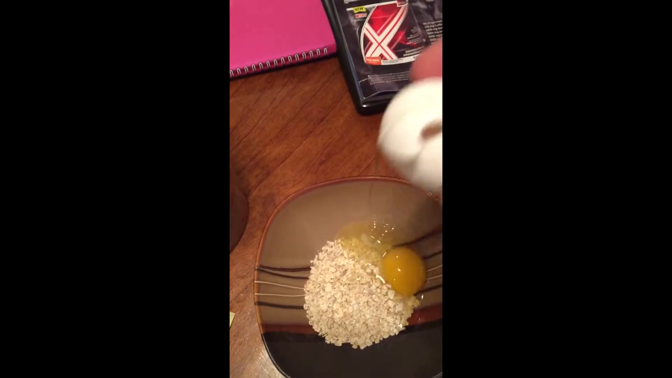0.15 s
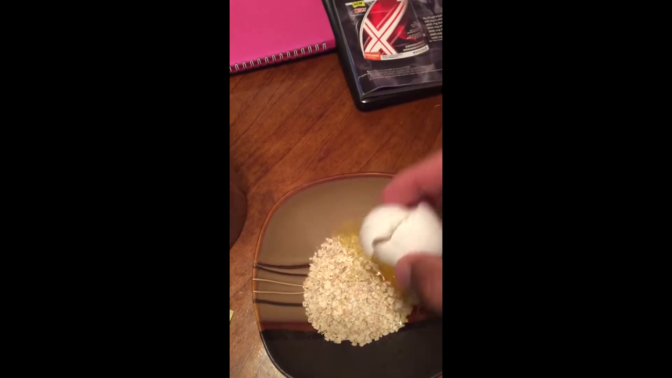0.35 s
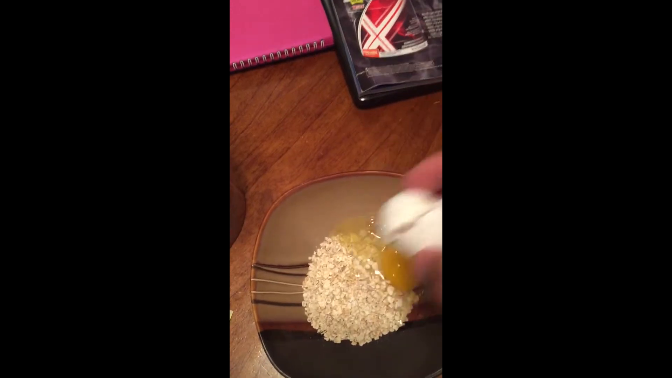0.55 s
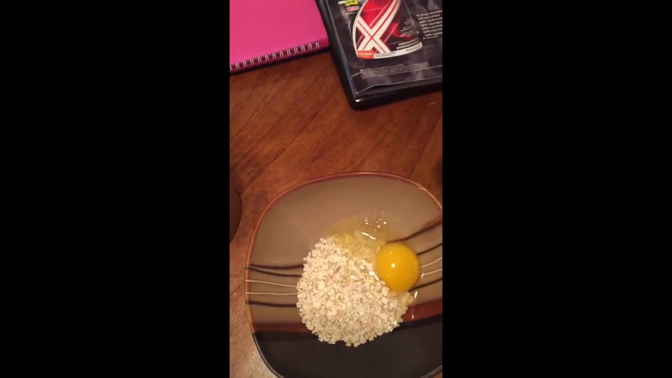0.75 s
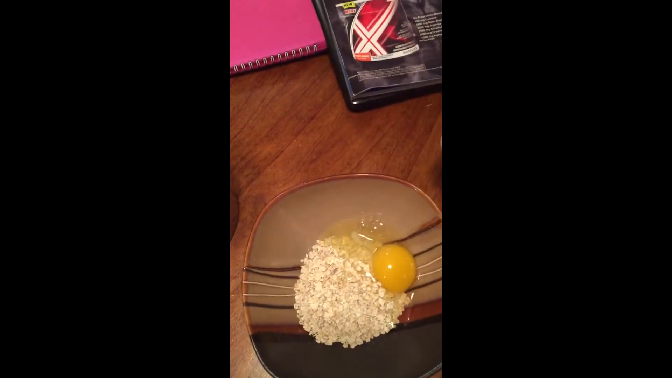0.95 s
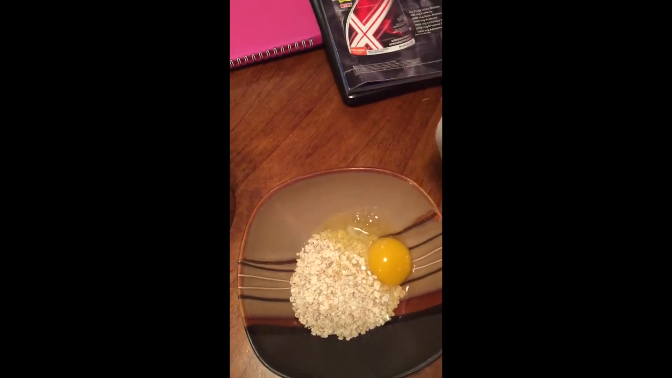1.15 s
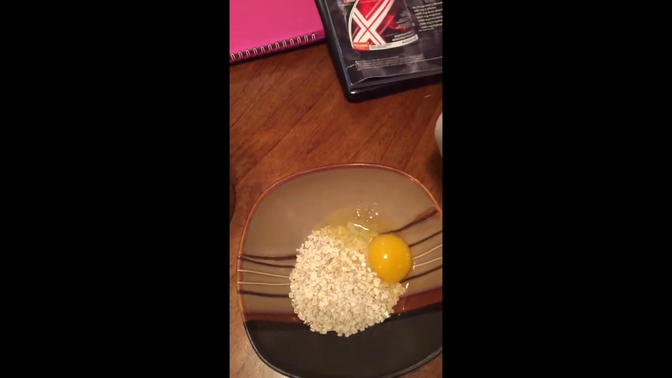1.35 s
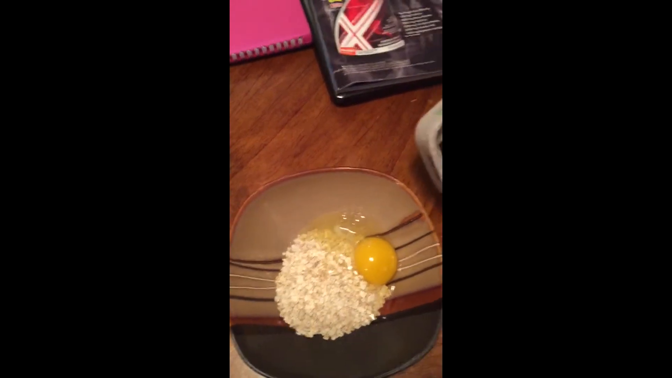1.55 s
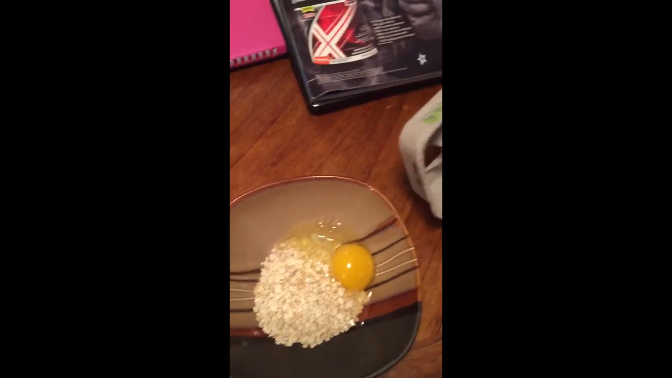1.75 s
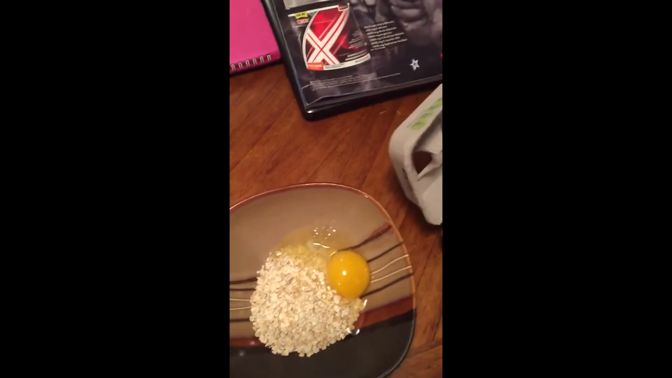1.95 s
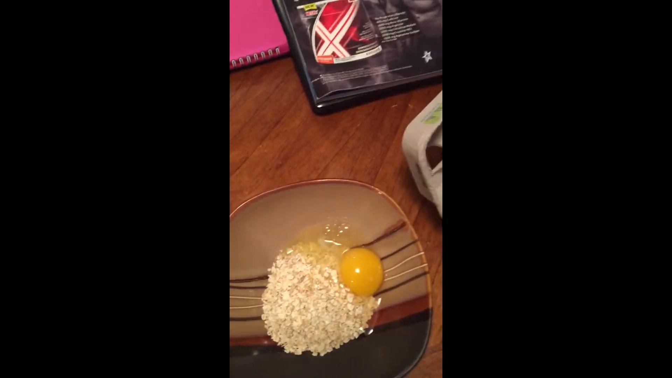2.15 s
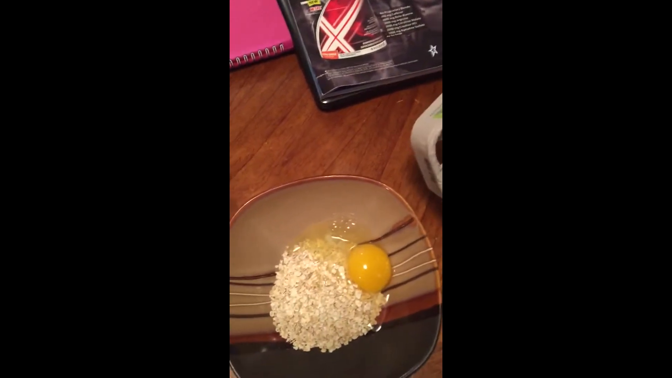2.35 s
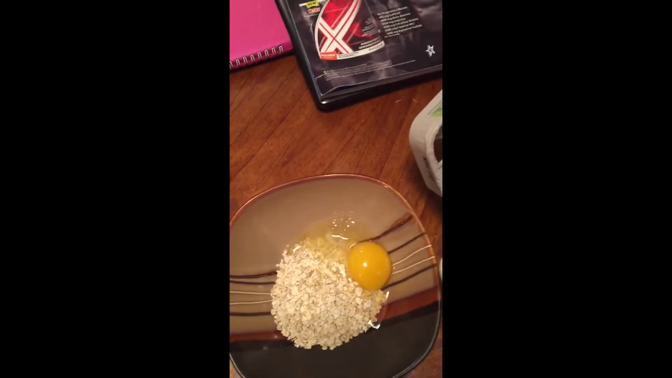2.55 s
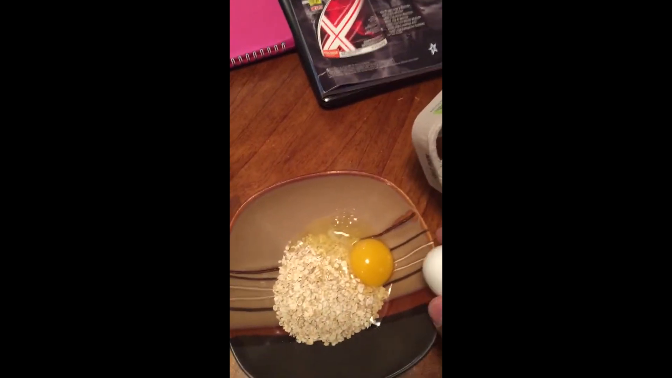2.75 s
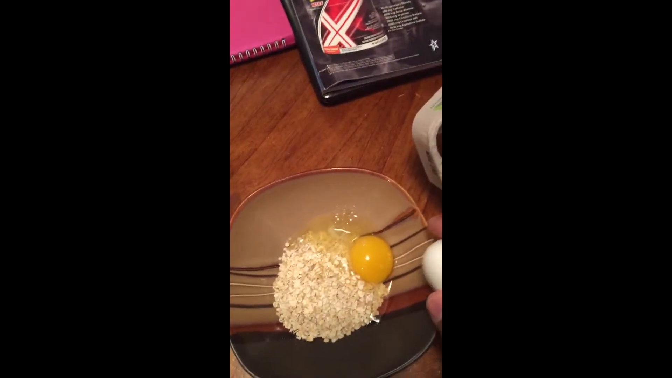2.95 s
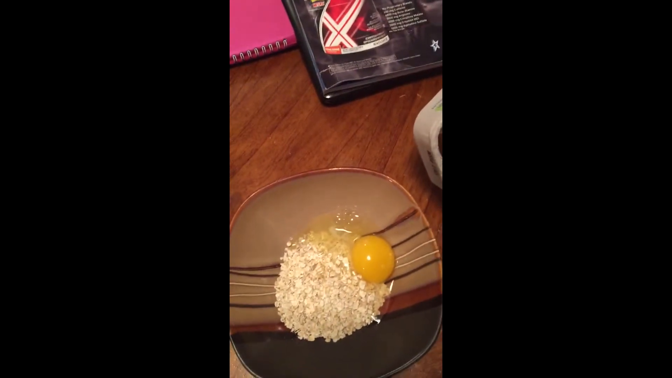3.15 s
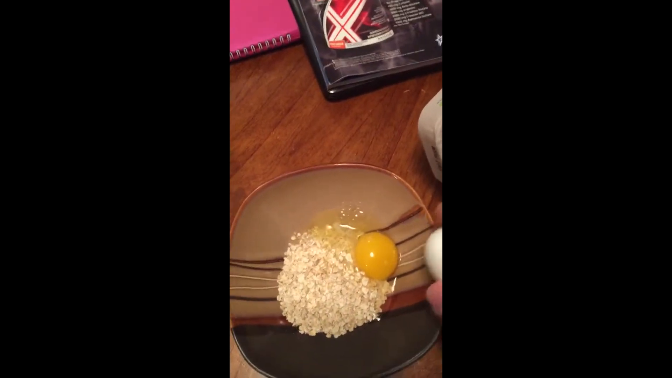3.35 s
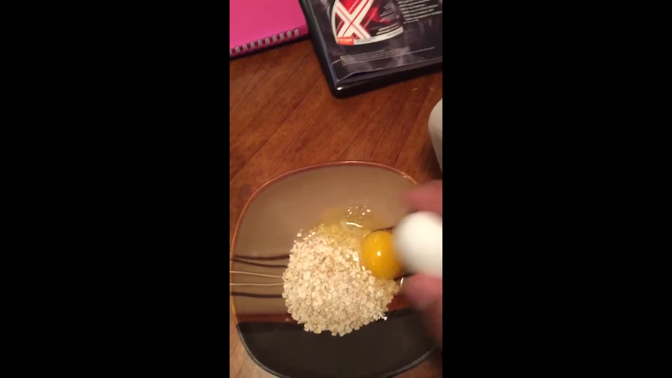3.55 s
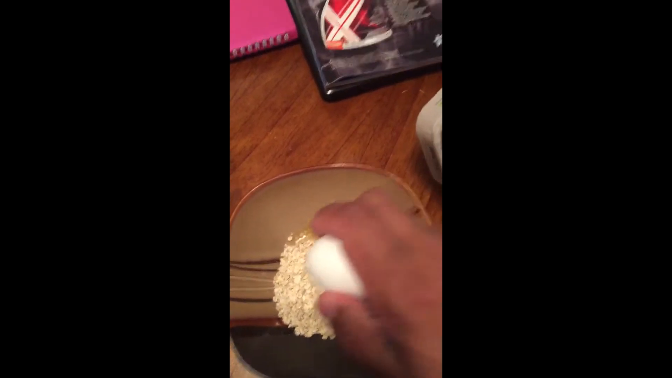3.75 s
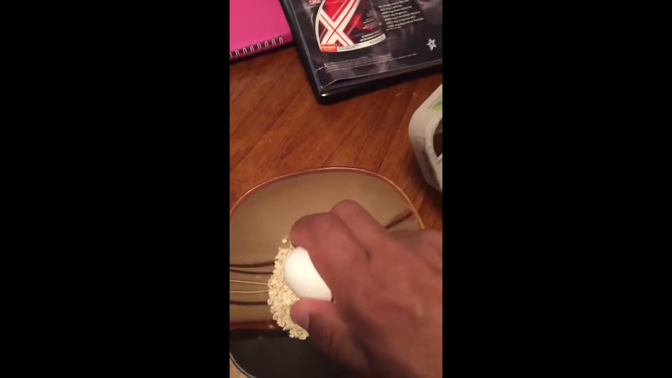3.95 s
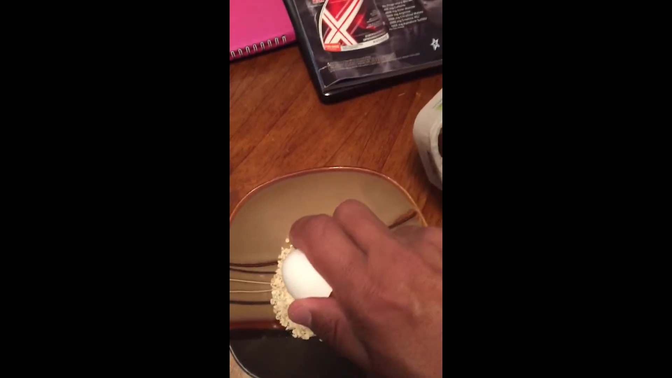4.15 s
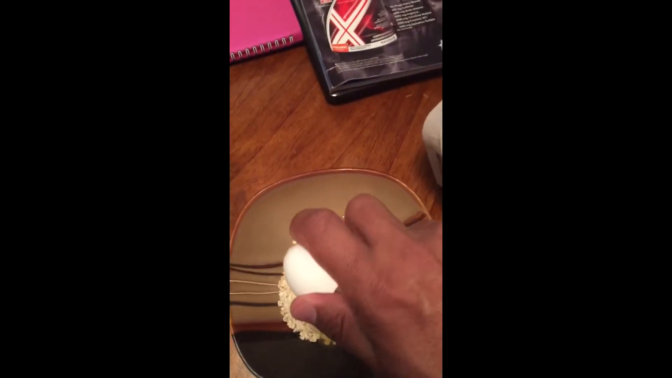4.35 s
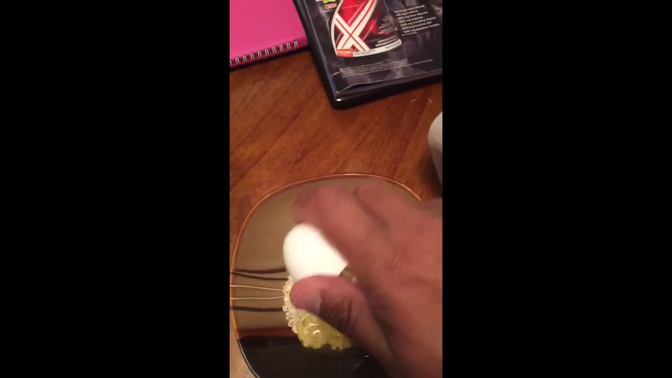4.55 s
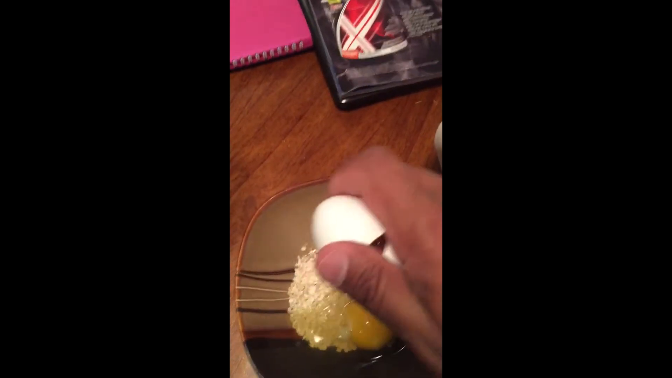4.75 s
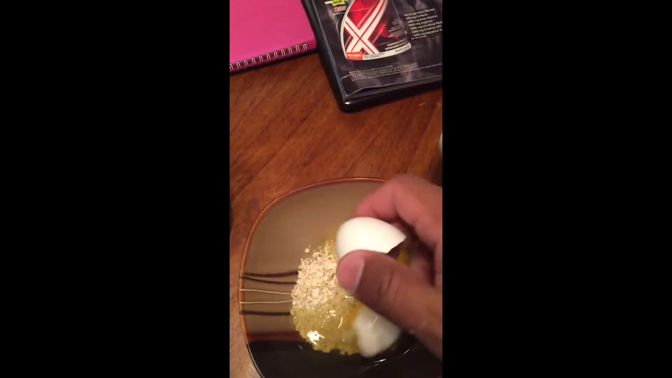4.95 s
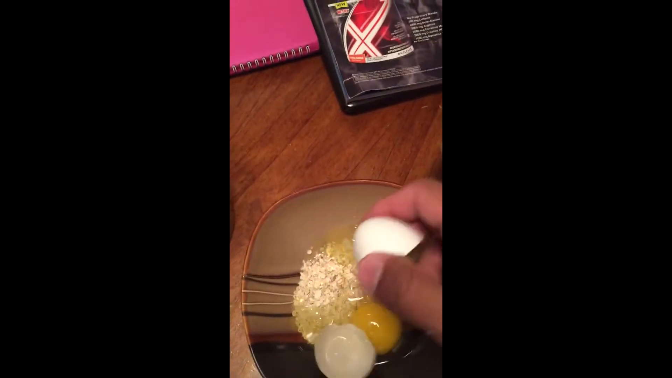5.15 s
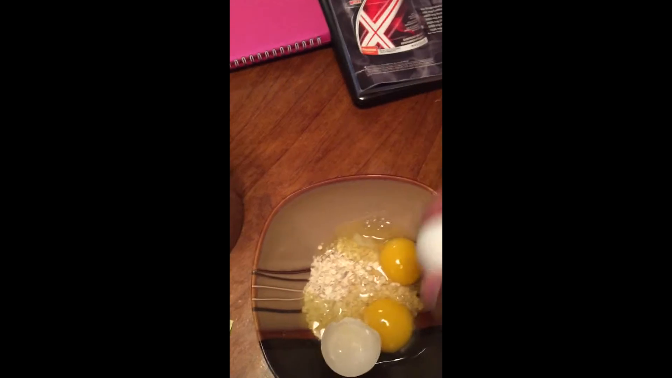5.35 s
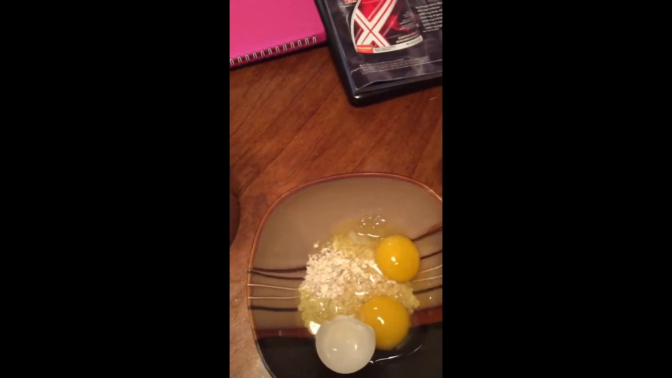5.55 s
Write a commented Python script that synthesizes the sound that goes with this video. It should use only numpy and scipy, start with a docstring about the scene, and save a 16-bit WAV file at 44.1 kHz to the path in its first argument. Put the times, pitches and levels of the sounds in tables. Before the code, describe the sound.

A faint, low fridge hum and soft room air run throughout in a small kitchen, with the microphone close above a bowl. At about 1 second an empty eggshell lands with a hollow pop and a tiny bounce. From 1.3 to 1.9 seconds an egg rasps softly out of a pulp carton, followed by a barely audible brush of fingers on shell. At 2.8 seconds the egg knocks against a ceramic bowl. At 3.3 seconds comes the loudest sound, a sharp crunching strike that makes the bowl ring briefly and rock on the wooden table. From 3.8 to 4.4 seconds the shell crackles open in quick, crisp snaps, with small wet squelches as the egg slips out. A few softer clicks and wet pops follow until 4.9 seconds. At 5.2 seconds half the shell drops into the bowl with a light clink, and small ticks follow until 5.5 seconds.

```python
"""A fridge hums in a small kitchen, and an empty eggshell is dropped aside with a hollow pop.
A new egg rasps out of its pulp carton. It is tapped, then struck on the rim of a ceramic bowl,
which rings and rocks on the wooden table. Thumbs crackle the shell open in volleys of tiny breaks,
the egg slips out with a squelch of air pockets, and half of the shell falls into the bowl.
A phone picks it all up from close by."""
import sys
import numpy as np
from scipy import signal
from scipy.fft import rfft, irfft
from scipy.io import wavfile

SR = 44100
rng = np.random.default_rng(int(sys.argv[2]) if len(sys.argv) > 2 else 0)


def wrap_up_sound(samples):
    """Save the sound to the file named by the first command line argument, as 16-bit audio."""
    columns = np.atleast_2d(samples).T
    # keep every value between -1 and 1, then stretch to whole-number steps
    tamed = np.clip(columns, -1, 1)
    steps = np.round(tamed * 32767).astype(np.int16)
    wavfile.write(sys.argv[1], SR, steps)


N = 247048
TIME = np.arange(N) / SR
AGE = np.arange(int(.7 * SR)) / SR  # seconds since a hit

# the kitchen's reverb: (frequency [Hz], t60 [s])
ROOM_DECAY = [(100, 1), (300, 0.66), (1000, 0.49), (3000, 0.44), (7000, 0.25), (15000, 0.2)]
# room tone: (frequency [Hz], relative level [dB])
AIR_EQ = [(15, -36), (25, -17), (59, 1.5), (88, -25), (101, -14.5), (125, -6.5), (146, -10), (191, -6),
          (293, -12), (383, -18), (543, -20.5), (856, -26), (1500, -27), (2240, -34), (15000, -49)]
# the fridge's drone bands: (centre [Hz], width [Hz], level [dB])
FRIDGE_BANDS = [(57, 14, -68.5), (124, 25, -67), (196.8, 69, -67), (545, 69, -65.5)]

# the empty shell lands and bounces: (time [s], level [dB], crush time [s])
SHELL_DROPS = [(0.8742, -48, 0.0055), (0.888, -49, 0.0042), (0.9515, -23, 0.0034), (0.9543, -24, 0.0014),
               (0.966, -28, 0.0062), (0.973, -26, 0.012), (0.982, -37, 0.0065)]
# its hollow tone: (frequency [Hz], gain [dB])
HOLLOW_EQ = [(30, -38), (200, -5.5), (600, -9), (800, 0), (1100, 7.5), (1400, -1.5), (1750, 2), (2100, -9),
             (4000, -11), (9000, -14), (15500, -21)]

# pulls that rub the egg out of the carton: (peak time [s], relative level [dB], rise [s])
CARTON_PULLS = [(1.39, -65.5, 0.1), (1.512, -49, 0.037), (1.59, -54.5, 0.22), (1.745, -45, 0.078),
                (1.8, -47, 0.032)]
# the rasp of pulp: (frequency [Hz], gain [dB])
PULP_EQ = [(200, -10), (600, -3), (1100, 6.5), (2000, 2), (3500, -1.5), (6000, -8), (9000, -16.5),
           (15000, -17.5)]
# the carton's damped walls: (frequency [Hz], relative level [dB], t60 [s])
CARTON_MODES = [(1204, 10, 0.092), (1580, 5, .03), (1980, 5, 0.062), (2720, 7.5, 0.043), (3350, -2, 0.029),
                (4300, -18, 0.023), (5700, 2.5, 0.04)]
# the egg catches on the carton: (time [s], level [dB], length [s])
CARTON_CATCHES = [(1.263, -45, .008), (1.522, -45, 0.0072), (1.795, -45, 0.0014)]
# fingers slide on the shell: (peak time [s], level [dB], rise [s])
FINGER_SLIDES = [(2.16, -62, 0.063), (2.29, -69.5, 0.12), (2.41, -62.5, .05)]
# the hiss of skin on shell: (frequency [Hz], gain [dB])
SKIN_EQ = [(1000, -7), (4000, -5), (6500, -6), (8000, 3.5), (10500, -4), (14500, 2)]

# the bowl is pushed against the table and rocks back:
# (time [s], swing level [dB], knock level [dB], contact brightness [Hz])
BOWL_BLOWS = [(2.824, -11, -14.5, 1065), (2.831, -19, -29.5, 840), (3.011, -34, -34.5, 750),
              (3.335, -12, -12.5, 1930), (3.3819, -18, -11, 1450), (3.3852, -11, -11.5, 1550),
              (3.3968, -27.5, -13.5, 826), (3.415, -21, -14, 1480)]
# low swings of the bowl on the table top: (frequency [Hz], relative level [dB], t60 [s])
SWING_MODES = [(205, -14, .3), (238, -17, .15), (294, 0, .27), (398, -9, .2), (490, -17, .15),
               (590, -14, .15), (657, -12, .2), (700, -15, .15), (870, -8, .17), (992, -13, .14),
               (1033, -11, .11), (1210, -18, .1)]
# the table's woody knock: (frequency [Hz], gain [dB])
WOOD_EQ = [(30, -40.5), (110, -13), (220, 4), (380, -0.5), (520, -2.5), (700, -1), (1000, 5), (1300, -4),
           (1900, -2), (3000, -5), (8000, 0.5)]
# shell meets ceramic: (time [s], crush level [dB], crush time [s], ring level [dB])
CERAMIC_HITS = [(2.8225, -35, 0.0022, -40), (3.0064, -68, 0.0025, -58), (3.3343, -5, 0.003, -11.5),
                (3.3401, -16, 0.0037, -46), (5.2, -45, 0.0016, -28.5)]
# the bowl's ringing wall: (frequency [Hz], relative level [dB], t60 [s])
CERAMIC_MODES = [(1936, -1, .12), (2010, 0, .17), (3270, 1.5, .2), (3410, -11, .29), (3731, -19, .18),
                 (5052, -9, .23), (5240, -14, .1), (6169, -15, .13), (6970, -7, .16), (7934, -11, .08),
                 (9286, -21, .15), (11850, -18, .12)]
# the crunch of shell on ceramic: (frequency [Hz], gain [dB])
CRUSH_EQ = [(40, -38.5), (250, -17.5), (600, -17.5), (1100, 3.5), (1600, -1), (2100, 3), (2700, 2.5),
            (4200, -2), (5800, 3.5), (8000, 1.5), (11000, -3.5), (15500, -4.5)]

# egg white slips out of the shell and into the bowl: (peak time [s], level [dB], rise [s])
SQUELCHES = [(4.13, -39, 0.023), (4.228, -40.5, 0.027), (4.34, -65, 0.26), (5.26, -61, 0.11)]
# air pockets in the white: (frequency [Hz], gain [dB])
WET_EQ = [(400, -27), (750, -20.5), (950, 3.5), (1250, -6), (1600, -6), (2100, -17), (3500, -19),
          (9000, -34)]
# thumbs crumble shell and membrane: (peak time [s], level [dB], rise [s])
THUMB_SQUEEZES = [(3.95, -36, 0.035), (4.063, -35.5, 0.019), (4.145, -46.5, .05), (4.228, -39.5, 0.024),
                  (4.3, -55, 0.037), (4.44, -55.5, 0.036), (4.51, -60, 0.058), (4.79, -56.5, .12),
                  (5.32, -62, .2)]
# the crisp tone of breaking shell: (frequency [Hz], gain [dB])
FRACTURE_EQ = [(100, -46), (700, -16), (1100, 4), (2200, 4.5), (3300, 5.5), (4800, 1.5), (6500, 3.5),
               (7500, -1.5), (8500, 3), (10500, -1.5), (13000, 3), (16000, 4)]
# dry snaps of the shell: (time [s], level [dB], length [s])
DRY_SNAPS = [(3.7756, -37.5, 0.0012), (3.785, -41.5, 0.0051), (3.866, -34.5, .0024), (3.9, -27, 0.0048),
             (3.916, -33, 0.0029), (3.921, -24, 0.00037), (3.932, -36, 0.0028), (3.9595, -28, 0.0015),
             (3.991, -39, .0025), (4.018, -35.5, 0.0034), (4.063, -29.5, 0.0027), (4.114, -13.5, 0.0019),
             (4.135, -33, 0.0017), (4.154, -25.5, 0.0038), (4.165, -34, 0.0046), (4.1894, -28.5, 0.00057),
             (4.492, -45.5, 0.0063), (4.63, -52.5, 0.0035), (4.7427, -25, 0.0028), (4.837, -48, 0.0024),
             (4.894, -55.5, 0.0032), (5.467, -33, 0.0019)]
# how far the shell in the hand gapes: (time [s], opening [0-1])
SHELL_GAPE = [(4.11, 0.02), (4.16, 0.9), (4.74, 1), (5.47, .4)]
# shell and membrane part: (time [s], note level [dB], length [s], note [Hz])
WET_POPS = [(4.1633, -30, 0.0077, 1070), (4.204, -37, 0.0012, 3700), (4.2146, -27.5, 0.0056, 3650),
            (4.2215, -25, 0.003, 3560), (4.229, -28, 0.0016, 3600), (4.3146, -30.5, 0.00083, 3570),
            (4.3152, -25.5, 0.00058, 1346), (4.4323, -42.5, .007, 1430), (4.622, -46.5, 0.0013, 3220),
            (4.775, -35.5, 0.0043, 1740), (4.79, -32, 0.0047, 1720), (5.347, -45, 0.0015, 3000)]
# half of the shell lands in the bowl and settles: (time [s], level [dB], length [s])
SHELL_LANDINGS = [(5.2, -22.5, 0.0009), (5.263, -46, 0.0037), (5.299, -42, 0.0033), (5.326, -47.5, 0.0052)]


def amp(db):
    """Decibels to gain."""
    return 10 ** (np.asarray(db) / 20)


def unit(x):
    """Scale a transient to the energy of 2 ms at full level."""
    return x * np.sqrt(.002 * SR / np.sum(x ** 2))


def steady(x):
    """Scale a lasting sound to rms 1."""
    return x / np.std(x)


def along(points, hz):
    """Read (frequency, value) points on a log-frequency axis."""
    point_hz, value = np.transpose(points)
    return np.interp(np.log(hz + 1), np.log(point_hz), value)


def through(x, response):
    """Convolve, keeping the length."""
    return signal.fftconvolve(x, response)[:len(x)]


def colour(x, eq, size=4096):
    """Apply an EQ curve as a causal filter, built from its cepstrum."""
    gain = amp(along(eq, np.fft.rfftfreq(size, 1 / SR)))
    cepstrum = irfft(np.log(gain))
    cepstrum[1:size // 2] *= 2
    cepstrum[size // 2 + 1:] = 0
    return through(x, irfft(np.exp(rfft(cepstrum))))


def soften(x, hz, order=2):
    """Low-pass: a softer contact gives a longer push."""
    return signal.sosfilt(signal.butter(order, min(hz, SR / 2 - 1000), fs=SR, output="sos"), x)


def ring(modes):
    """Damped sines; neighbouring modes swing in opposite directions."""
    return sum((-1) ** k * amp(db - 60 * AGE / t60) * np.sin(2 * np.pi * hz * AGE)
               for k, (hz, db, t60) in enumerate(modes))


def add(track, s, sound):
    """Mix a sound into the track at time s."""
    start = int(s * SR)
    track[start:start + len(sound)] += sound[:N - start]


def grains(count, spread_db):
    """A dense run of tiny slips or breaks of unequal size."""
    return steady(rng.standard_normal(count) * amp(spread_db * rng.standard_normal(count)))


def effort(strokes, release):
    """Each stroke swells by 20 dB over its rise time and falls as far in release times that long."""
    swells = [amp(db - 20 * np.maximum(s - TIME, (TIME - s) / release) / rise) for s, db, rise in strokes]
    return np.max(swells, axis=0)


def friction(envelope, eq, spread_db, catch_db, catch_hz):
    """Tiny slips come in uneven catches and ride the envelope of the strokes."""
    catches = steady(soften(rng.standard_normal(N), catch_hz))
    slips = grains(N, spread_db) * amp(catch_db * catches)
    return envelope * steady(colour(slips, eq))


def fracture(length, eq, count=4096):
    """A crack runs as a volley of tiny breaks that swells quickly and fades."""
    progress = AGE[:count] / length
    envelope = np.exp(-progress ** 1.5) * (1 - np.exp(-5 * progress))
    return unit(colour(grains(count, spread_db=2) * envelope, eq))


def snap(length, note_hz, note_db, bright_hz):
    """One click of shell: it rings for only a few cycles and radiates little below its note."""
    breaks = fracture(length, FRACTURE_EQ)
    resonance = ring([(note_hz, 0, 13 / note_hz)])[:len(breaks)]
    note = unit(through(breaks, resonance))
    low_cut = signal.butter(2, 1.14 * min(note_hz, 3000), "high", fs=SR, output="sos")
    click = unit(signal.sosfilt(low_cut, soften(breaks, bright_hz)))
    return click + amp(note_db) * note


def kitchen(x, early_db=5, early_t60=.11, build_s=0.0018):
    """Reverb: nearby things answer at once; the walls add a tail that dies sooner in the treble."""
    noise, hz = rfft(rng.standard_normal(len(AGE))), np.fft.rfftfreq(len(AGE), 1 / SR)
    response = rng.standard_normal(len(AGE)) * amp(early_db - 60 * AGE / early_t60)
    for band_hz, t60 in ROOM_DECAY:
        band = along([(f, f == band_hz) for f, _ in ROOM_DECAY], hz)
        response += irfft(noise * band, len(AGE)) * amp(-60 * AGE / t60)
    response *= 1 - np.exp(-(AGE / build_s) ** 2)
    return through(x, response / np.sqrt(np.sum(response ** 2)))


def room_tone():
    """A soft, bass-heavy bed of room air."""
    return amp(-57.5) * steady(colour(rng.standard_normal(N), AIR_EQ))


def fridge(hum_hz=120, hum_db=-62):
    """A steady mains hum among a few narrow bands of drone."""
    out = amp(hum_db) * steady(np.sin(2 * np.pi * hum_hz * TIME))
    hz = np.fft.rfftfreq(N, 1 / SR)
    for centre, width, db in FRIDGE_BANDS:
        band = np.exp(-2 * ((hz - centre) / width) ** 2)
        phases = np.exp(2j * np.pi * rng.random(len(hz)))
        out += amp(db) * steady(irfft(band * phases, N))
    return out


def dropped_shell():
    """The empty shell pops hollowly and bounces, further off, so the room takes a larger share."""
    out = np.zeros(N)
    for s, db, length in SHELL_DROPS:
        add(out, s, amp(db) * fracture(length, HOLLOW_EQ))
    return out + kitchen(amp(-6) * out, early_db=9.5)


def carton():
    """The egg rubs on pulp, and the rasp sets the carton's damped walls ringing."""
    pulls = effort(CARTON_PULLS, release=0.96)
    rasp = friction(pulls, PULP_EQ, spread_db=3, catch_db=2.5, catch_hz=120)
    walls = ring(CARTON_MODES)
    body = through(rasp, walls / np.sqrt(np.sum(walls ** 2)))
    out = amp(1.5) * rasp + amp(-18.5) * body
    return out + kitchen(amp(-13.5) * out)


def fingers():
    """Skin brushes the shell with a faint, dry hiss."""
    slides = effort(FINGER_SLIDES, release=1)
    return friction(slides, SKIN_EQ, spread_db=2, catch_db=0.5, catch_hz=60)


def rocking_bowl(knock_t60=0.065):
    """Each blow swings the bowl and knocks the table, whose many damped modes blur into noise."""
    swings, knocks, swing = np.zeros(N), np.zeros(N), ring(SWING_MODES)
    for s, swing_db, knock_db, contact_hz in BOWL_BLOWS:
        knock = colour(rng.standard_normal(len(AGE)) * amp(-60 * AGE / knock_t60), WOOD_EQ)
        add(swings, s, amp(swing_db) * unit(soften(swing, contact_hz, order=3)))
        add(knocks, s, amp(knock_db) * unit(soften(knock, contact_hz, order=3)))
    return swings + knocks + kitchen(amp(-14) * swings + amp(-8.5) * knocks, early_db=-4.5)


def ceramic_hits():
    """Shell crushes against the ceramic, which rings briefly."""
    crush, rings, wall = np.zeros(N), np.zeros(N), unit(ring(CERAMIC_MODES))
    for s, crush_db, length, ring_db in CERAMIC_HITS:
        add(crush, s, amp(crush_db) * fracture(length, CRUSH_EQ))
        add(rings, s, amp(ring_db) * wall)
    reverb = kitchen(amp(-13) * rings, early_db=-10) + kitchen(amp(-10) * crush, early_db=1)
    return crush + rings + reverb


def egg_white():
    """Small air pockets pop as the wet white pulls apart and lands."""
    flow = effort(SQUELCHES, release=1.1)
    pops = friction(flow, WET_EQ, spread_db=7, catch_db=3, catch_hz=150)
    return pops + kitchen(amp(-12.5) * pops)


def crumble():
    """Small flakes crumble under the thumbs between the snaps."""
    squeezes = effort(THUMB_SQUEEZES, release=0.86)
    flakes = friction(squeezes, FRACTURE_EQ, spread_db=4, catch_db=4, catch_hz=250)
    return flakes + kitchen(amp(-16) * flakes)


def cracks():
    """The shell gives way in snaps that shed chips and grow lower and duller as it opens."""
    closed_note_hz, open_note_hz, note_db = 3570, 1700, -4
    closed_bright_hz, open_bright_hz = 15600, 10800
    chip_delay_s, chip_length_s = .06, 0.0023
    out = np.zeros(N)
    for s, db, length in DRY_SNAPS:
        opening = np.interp(s, *np.transpose(SHELL_GAPE))
        note_hz = closed_note_hz * (open_note_hz / closed_note_hz) ** opening
        bright_hz = closed_bright_hz * (open_bright_hz / closed_bright_hz) ** opening
        add(out, s, amp(db) * snap(length, note_hz, note_db, bright_hz))
        # three much quieter chips trail each snap
        for wait, chip_db in zip(rng.exponential(chip_delay_s, size=3), rng.normal(-26, 3, size=3)):
            chip = snap(chip_length_s, note_hz, note_db, bright_hz)
            add(out, min(s + wait, TIME[-1]), amp(db + chip_db) * chip)
    return out


def eggshell(pop_note_db=9):
    """The shell cracks, pops wetly, catches on the carton and lands in the bowl, all in one reverb."""
    out = cracks()
    for s, db, length, note_hz in WET_POPS:
        pop = snap(length, note_hz, pop_note_db, bright_hz=2.56 * note_hz)  # more note than click
        add(out, s, amp(db - pop_note_db) * pop)
    for s, db, length in CARTON_CATCHES:
        add(out, s, amp(db) * snap(length, note_hz=1620, note_db=-3, bright_hz=10900))
    for s, db, length in SHELL_LANDINGS:
        add(out, s, amp(db) * snap(length, note_hz=3270, note_db=-13, bright_hz=7340))
    return out + kitchen(amp(-11) * out, early_db=9)


def scene():
    """Everything reaches one microphone above the bowl."""
    hits = rocking_bowl() + ceramic_hits() + dropped_shell() + eggshell()
    textures = carton() + fingers() + crumble() + egg_white()
    bed = room_tone() + fridge()
    return (hits + textures + bed)[None]


def record(dry):
    """The phone drops the deep bass, rounds the loudest peak and cuts the top."""
    bottom_hz, top_hz, ceiling = 42, 15400, .8
    low_cut = signal.butter(4, bottom_hz, "high", fs=SR, output="sos")
    high_cut = signal.ellip(10, .2, 70, top_hz, fs=SR, output="sos")
    rounded = ceiling * np.tanh(signal.sosfilt(low_cut, dry) / ceiling)
    return signal.sosfilt(high_cut, rounded)


dry = scene()
out = record(dry)
wrap_up_sound(out)
```